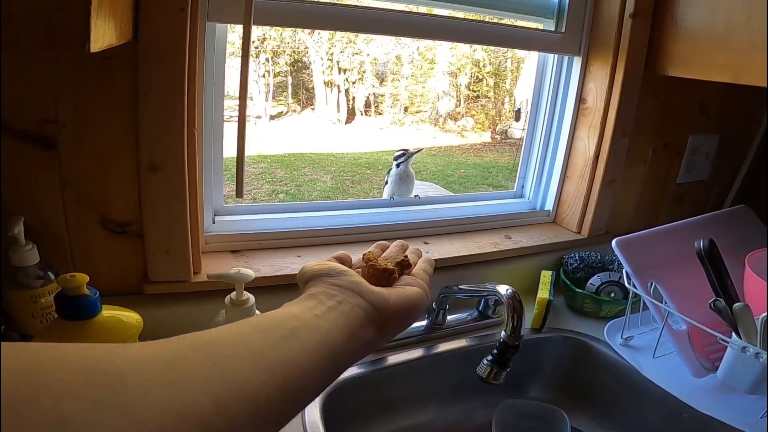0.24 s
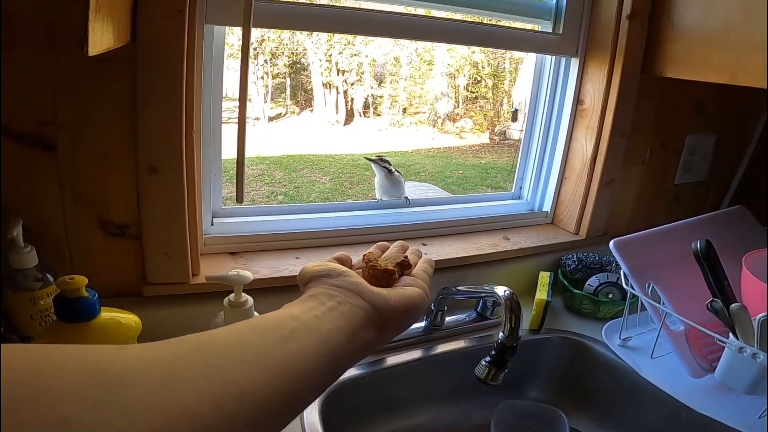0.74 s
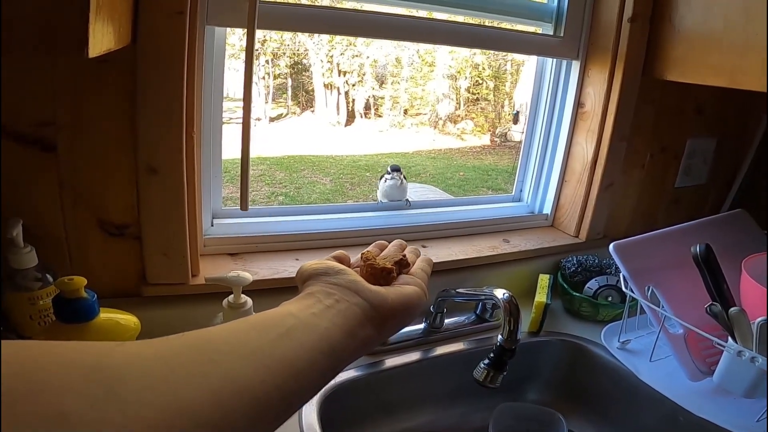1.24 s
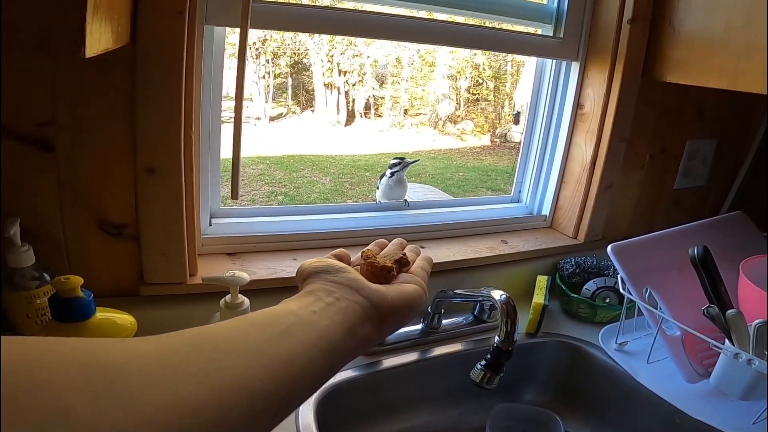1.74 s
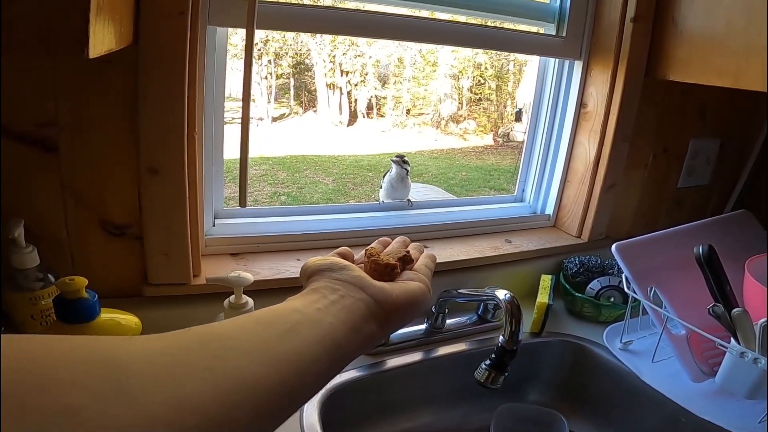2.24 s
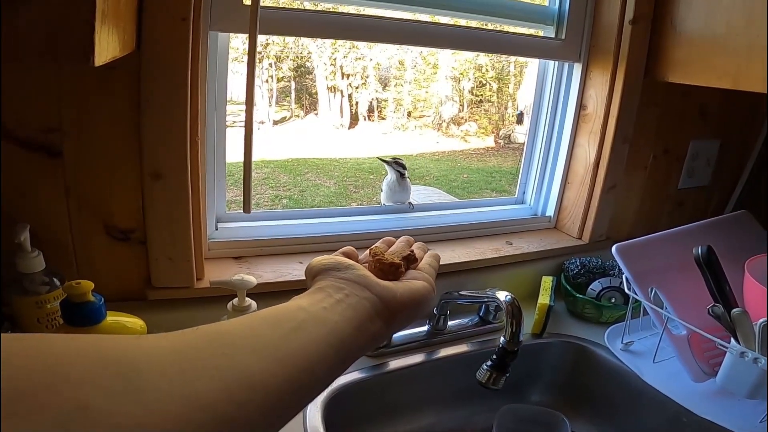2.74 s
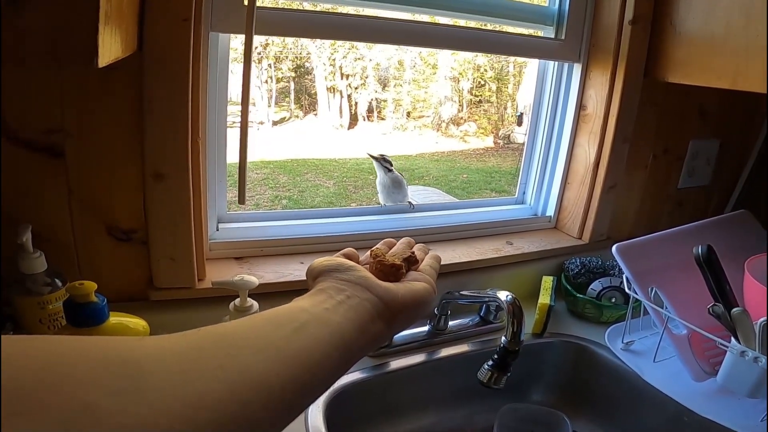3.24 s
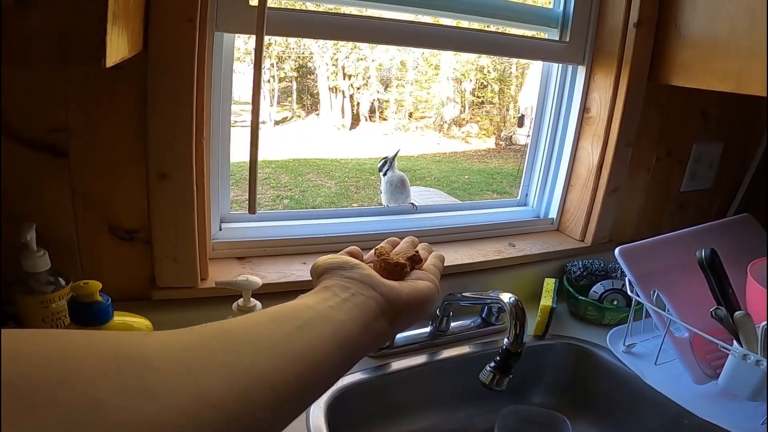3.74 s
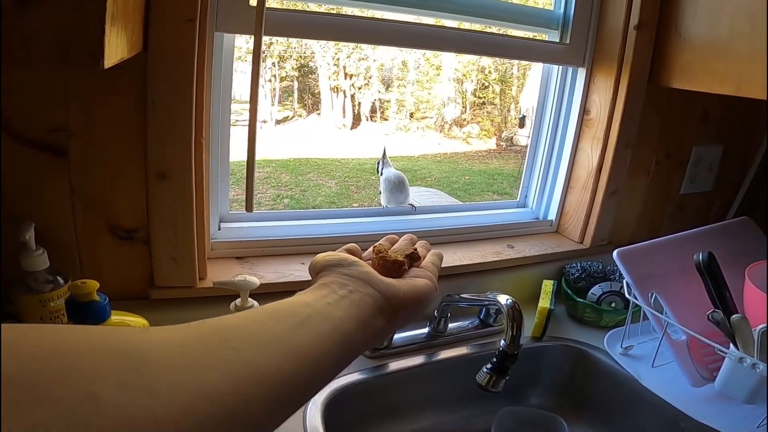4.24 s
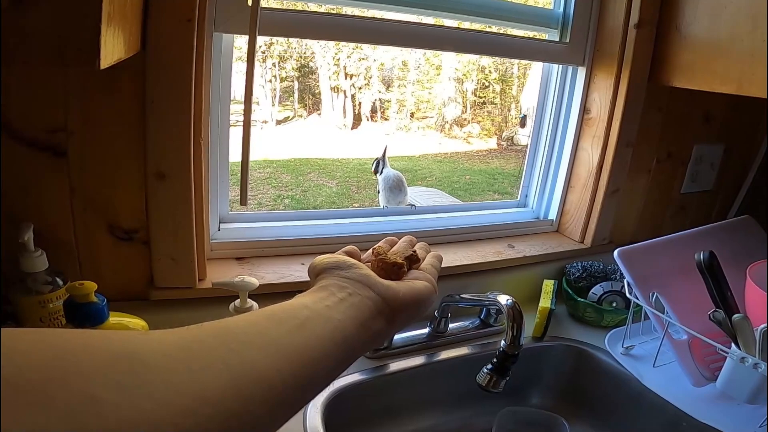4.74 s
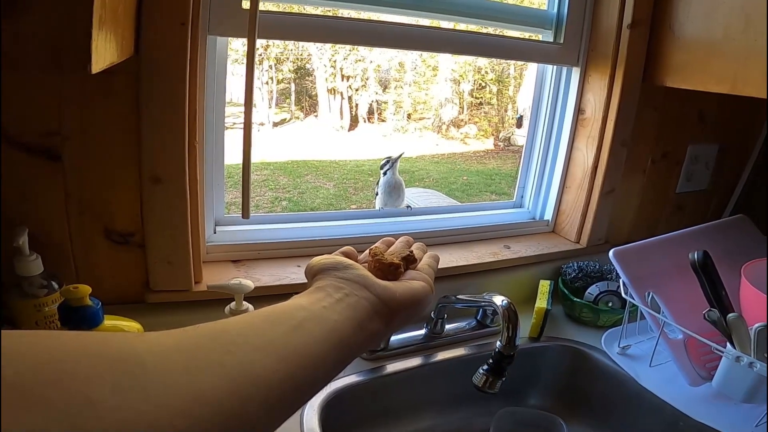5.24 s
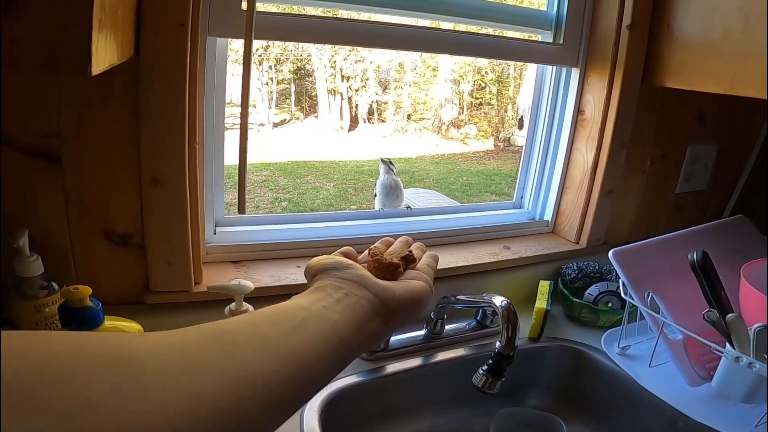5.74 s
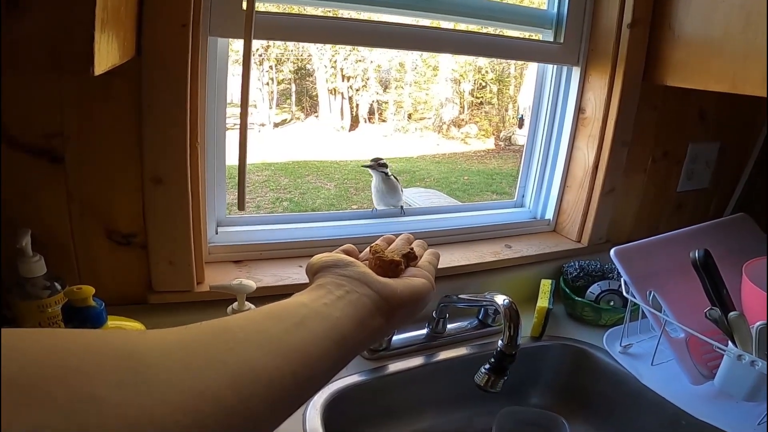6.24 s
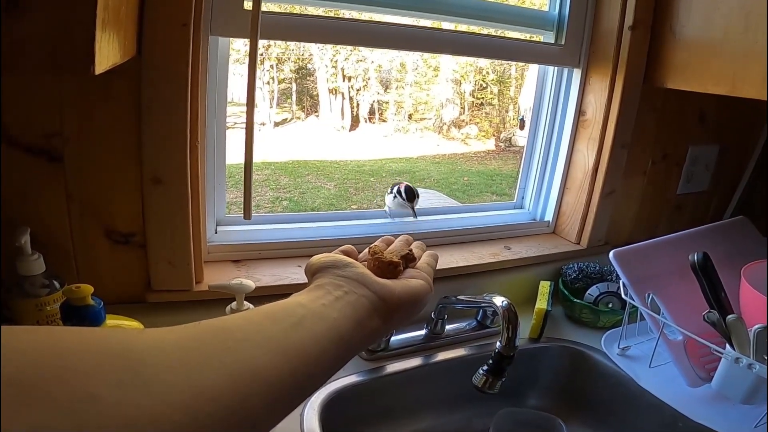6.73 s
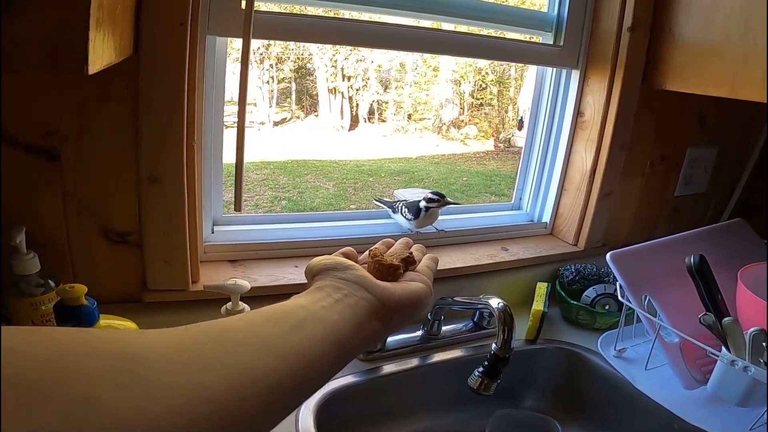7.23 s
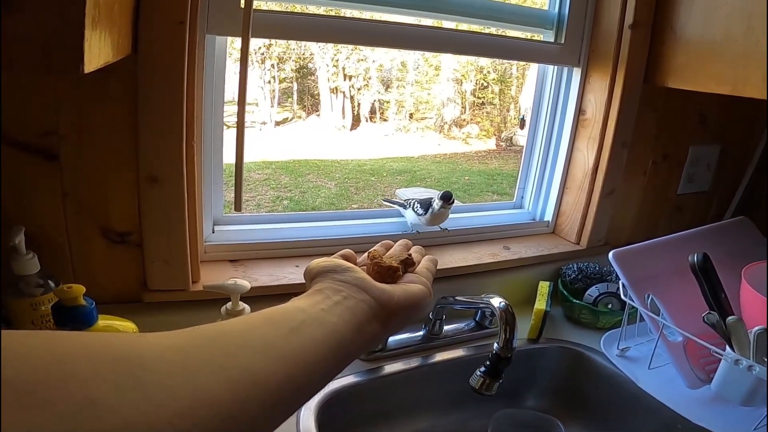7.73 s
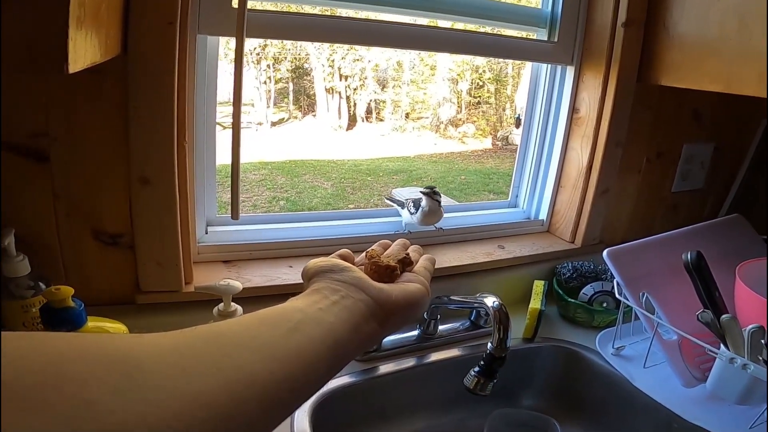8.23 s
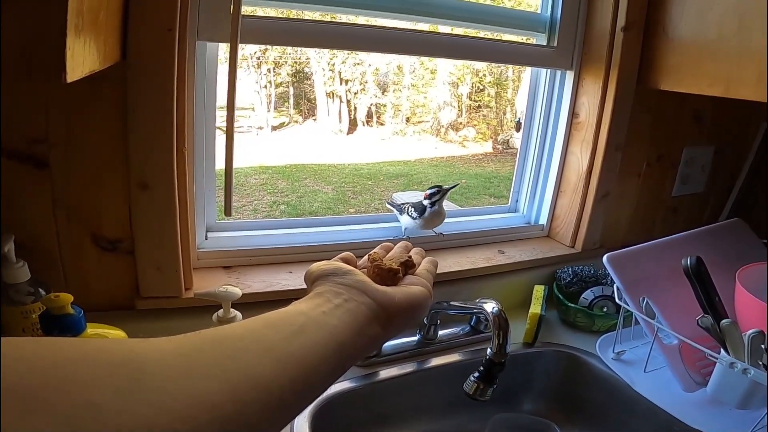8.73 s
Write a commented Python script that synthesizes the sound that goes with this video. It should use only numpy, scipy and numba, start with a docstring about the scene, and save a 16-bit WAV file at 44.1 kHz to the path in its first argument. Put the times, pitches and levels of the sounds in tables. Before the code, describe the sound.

Over a low refrigerator hum and faint chirps from the garden, a nearby woodpecker calls three times, each a short buzz flipping into a piercing whistle that rings briefly in the kitchen. Light wind rumbles and bumps the microphone just before the second call. Toward the end the small birds grow busier and the woodpecker's claws click and scratch on the window frame in two quick clusters.

```python
"""Woodpecker at the kitchen window

A woodpecker gives three sharp calls, each a buzz that flips up into a whistle. It hops, and its
claws tap the window frame. Small birds chirp in the garden, a fridge hums and the air rushes softly.
Wind thumps the left microphone of a small camera, which later joins its two microphones into mono.
The camera turns its volume down after each loud call."""
import sys
import numpy as np
from scipy import signal
from scipy.fft import rfft, irfft, next_fast_len
from scipy.io import wavfile
from scipy.ndimage import uniform_filter1d
from numba import njit

SR = 44100
rng = np.random.default_rng(int(sys.argv[2]) if len(sys.argv) > 2 else 0)


def generate_wav(sig):
    """Save sig (samples, or channels by samples) to the path in sys.argv[1] as 16-bit PCM at SR."""
    pcm = np.round(np.clip(np.atleast_2d(sig).T, -1, 1) * 32767).astype(np.int16)
    wavfile.write(sys.argv[1], SR, pcm)


N = 396018
T = np.arange(N) / SR

# Woodpecker calls: flip_s, drop_s, top_hz, arch_hz, flip_db, drop_db, octave_db, buzz_db
CALLS = [(0.4883, 0.536, 5636, 139.1, -14.5, -9, -19.5, -21),
         (3.180, 3.228, 5722, 170.1, -16, -12, -28, -20),
         (6.0805, 6.1318, 5577, 399.8, -15.5, -4.5, -21.5, -29.5)]
# Flutter heard on each held whistle as room echoes add and cancel: time_s, level_db
ECHO_FLUTTER = [
    [(.4895, -13.5), (.495, -20.5), (.510, -28.5), (.52, -16.5), (.532, -24.5), (.536, -27.5)],
    [(3.1815, -23), (3.188, -14.5), (3.197, -24.5), (3.211, -21), (3.222, -16), (3.228, -25.5)],
    [(6.084, -7.5), (6.088, -24.5), (6.096, -21), (6.105, -7), (6.112, -25), (6.122, -26.5), (6.1295, -8),
     (6.1315, -21)],
]
# Tones in the buzz: multiple (of half the whistle's pitch), level_db
BUZZ_TONES = [(1, -2), (3, 1), (5, -5.5), (7, -12)]
# How the throat colours the buzz: pitch_hz, gain_db
THROAT = [(500, -10), (900, -3.5), (1500, -3.5), (3000, 1.5), (6500, 2.5), (8000, -3), (9500, -14),
          (11300, -13.5), (12000, -30)]
# Claws hitting the frame: start_s, level_db, rise_s, fade_s, brightness_db_per_octave
TAPS = [(4.476, -58, 0.00095, .03, 3), (4.819, -49, .001, 0.032, -1), (5.213, -48.5, 0.0017, .05, -11),
        (6.448, -44.5, 0.0036, 0.085, -8), (6.523, -54, .003, 0.092, 1.5), (6.862, -46, 0.012, 0.051, 2),
        (6.880, -25.5, 0.00092, 0.064, 2.5), (6.934, -35, 0.005, .03, -6),
        (6.944, -21.5, 0.0017, 0.0786, -2), (7.272, -43, 0.026, 0.19, -4.5),
        (7.346, -39.5, 0.00094, 0.092, 1), (7.3948, -28, .001, 0.071, -1),
        (7.4116, -29.5, 0.0012, 0.061, -0.5), (7.446, -36.5, 0.0019, 0.081, -2.5),
        (7.965, -54, 0.021, 0.34, -3), (8.033, -58.5, 0.0019, .05, 2.5), (8.21, -49.5, 0.0079, 0.2, -6.5),
        (8.364, -45.5, 0.0055, 0.22, -6)]
# Notes the window frame rings at: pitch_hz, half_width_hz, level_db
FRAME_NOTES = [(1820, 320, 0), (3070, 850, -6.5), (4660, 490, 1.5), (5590, 304, -7), (6300, 150, 5),
               (7170, 450, 4)]
# Two-voiced cheeps: start_s, length_s, peak_hz, arch_depth (0-1), level_db, lower_voice_db, octave_db
CHEEPS = [(.948, .12, 3320, .6, -63.5, -67, -30), (1.192, 0.12, 3314, 0.88, -62, -61.5, -22.5),
          (2.519, 0.12, 3536, 0.94, -58, -62.5, -15.5), (3.738, 0.13, 3420, .95, -61, -61, -36.5),
          (4.088, .16, 3490, .8, -60, -58, -37), (4.34, 0.13, 3300, 0.39, -58, -55.5, -12.5),
          (5.42, 0.15, 3150, 0.22, -72, -82, -33), (5.576, .11, 3044, 0.16, -54.5, -75.5, -15),
          (5.59, .087, 3580, 0.1, -59, -80.5, -11), (5.758, .16, 3750, 0.92, -53, -59, -26),
          (6.546, 0.064, 3100, .4, -56, -73.5, -12), (6.754, .1, 3627, 0.38, -54, -74, -19),
          (7.105, .14, 3374, .9, -53, -68, -16)]
# Short hoarse chirps: start_s, length_s, start_hz, end_hz, level_db
HOARSE_CHIRPS = [(.002, .028, 5400, 4340, -58), (.084, 0.032, 7600, 4500, -60.5),
                 (.964, .033, 5470, 7030, -63.5), (1.126, .031, 4200, 5060, -64.5),
                 (1.446, 0.019, 3120, 2900, -61.5), (1.735, .09, 3290, 2905, -63.5),
                 (2.014, .011, 3400, 3000, -65.5), (2.234, .015, 3360, 3000, -64),
                 (6.0, .064, 4750, 3136, -55.5), (7.123, 0.078, 3970, 4200, -66)]
# Clear gliding chirps: start_s, length_s, start_hz, end_hz, level_db
CLEAR_CHIRPS = [(.14, .044, 4200, 5880, -63), (.25, 0.035, 6100, 4000, -66), (4.81, 0.034, 3730, 4113, -61),
                (4.85, .2, 3929, 3770, -76), (4.95, .07, 2350, 3397, -74.5), (5.99, 0.058, 2833, 2202, -64),
                (6.441, .05, 4580, 3760, -48.5), (6.569, .045, 4643, 3407, -50),
                (6.699, .05, 4390, 3500, -52), (6.813, .045, 4626, 3650, -51),
                (8.842, 0.037, 2970, 2900, -69)]
# Strength of the wind: time_s, level_db
GUSTS = [(0, -60), (2.3, -66), (2.62, -66.5), (2.74, -48), (2.87, -57), (3.4, -48.5), (3.78, -54),
         (3.9, -50), (4.07, -45), (4.14, -62), (4.3, -47), (4.6, -66), (4.72, -54), (6.12, -53), (6.3, -60),
         (7.0, -49.5), (7.7, -56), (8.38, -51), (8.8, -58), (8.98, -49)]
# Two low wind thumps and one sharp tick on the left microphone: time_s, level_db, pitch_hz
THUMPS_AND_TICK = [(2.6837, -25.5, 68), (2.734, -29, 48), (2.988, -39, 1600)]
# Tones of the fridge: pitch_hz, level_db
HUM_TONES = [(59.5, -49.5), (120, -60), (180, -79.5), (235, -66.5), (423, -69.5)]
# Colour of the background air: pitch_hz, gain_db
AIR_COLOUR = [(25, -32.5), (43, -10.5), (65, -1), (86, -21), (115, -10), (225, -11.5), (367, -20.5),
              (584, -24.5), (1500, -33.5), (3300, -46.5), (4500, -53), (7000, -53), (8500, -70.5),
              (12000, -82)]
# Colour of the camera's hiss in mono: pitch_hz, gain_db
HISS_COLOUR = [(1470, -48.5), (2500, -6.5), (2840, 2), (3530, -4.5), (4320, -7), (5210, -10.5),
               (6780, -2.5), (10900, -35), (15000, -30.5)]
# Slow swells of the background: time_s, air_db, fridge_db
SWELLS = [(0, 0.5, 0), (1, -2.5, -2), (2, 0, 1.5), (3, 0.5, 1), (4, -1.5, 0), (5, -1.5, 3), (5.8, 0.5, 4.5),
          (6.6, -3, -1), (7.5, -2, 1.5), (8.3, -0.5, 1.5), (9, -1.5, 1)]
# First echoes off the window recess, sink and cupboards: delay_s, gain_db
NEAR_WALLS = [(.0046, -9), (.0097, -12), (.0152, -14), (.0215, -15)]
# Lingering echo of the kitchen: pitch_hz, fade_s, gain_db
KITCHEN_ECHO = [(500, 0.35, -1.5), (2000, 0.49, 3.5), (3500, .5, -2.5), (5663, 0.49, 2), (8200, 0.46, -2.5),
                (11065, 0.39, -6), (14000, 0.22, -7.5)]
# Lingering echo of the trees: pitch_hz, fade_s, gain_db
TREE_ECHO = [(2000, 0.72, 0.5), (8015, 0.45, -1)]
# Treble on the left side compared with the right: time_s, gain_db
LEFT_TREBLE = [(0, -8), (.45, -12.5), (.9, -7.5), (1.5, -7), (2.4, 0.5), (2.9, -12.5), (3.15, -25.5),
               (3.6, -23.5), (4.2, -30), (4.4, -3.5)]

LEAD_S, DROP_S, TAIL_S = .0125, .0036, .017  # a call's lead-in, its quick drop, its whole ending
JOIN_S = (4.36, 4.52)  # the microphones blend into mono between these times


def woodpecker():
    """A low buzzy voice flips to a pure whistle an octave up, holds, and drops again."""
    out = np.zeros(N)
    for (flip, drop, top_hz, arch_hz, *levels), flutter in zip(CALLS, ECHO_FLUTTER):
        span = slice(int((flip - LEAD_S - .002) * SR), int((drop + TAIL_S + .004) * SR))
        hz = call_pitch(T[span], flip, drop, top_hz, arch_hz)
        curves = call_levels(T[span], flip, drop, np.abs(top_hz - hz), flutter, *levels)
        hz, whistle_db, buzz_db, octave_db = (uniform_filter1d(c, size=40) for c in (hz, *curves))
        phase = np.pi * np.cumsum(hz * (1 + .0021 * wobble(600)[span])) / SR  # at half pitch
        whistle = undb(whistle_db) * np.sin(2 * phase)
        octave = undb(octave_db + 1.6 * wobble(1200)[span]) * np.sin(4 * phase)
        buzz = sum(undb(db + 3 * wobble(700)[span]) * np.sin(k * phase) for k, db in BUZZ_TONES)
        breath = (undb(whistle_db - 25) + undb(buzz_db - 7.5)) * rng.standard_normal(len(hz))
        out[span] += np.sqrt(2) * (whistle + octave + colour(undb(buzz_db) * buzz + breath, THROAT))
    return out


def call_pitch(t, flip, drop, top_hz, arch_hz):
    """The pitch of one call glides up, leaps onto a gentle arch, drops fast and slides away."""
    def arch(t):
        return top_hz - arch_hz * (2 * (t - flip) / (drop - flip) - 1.35) ** 2  # peaks past halfway

    start_hz, flip_hz, landing_hz = 1878, 2798, 3977
    leap_s, slide_hz_per_s = .0016, 85000
    lead = np.interp(t, [flip - LEAD_S, flip], [start_hz, flip_hz])
    hold = arch(t) - (arch(flip) - flip_hz) * np.exp(-np.abs(t - flip) / leap_s)
    drop_left = np.clip(1 - (t - drop) / DROP_S, 0, 1) ** 2
    slide = landing_hz + (arch(drop) - landing_hz) * drop_left - slide_hz_per_s * (t - drop)
    return np.select([t < flip, t < drop], [lead, hold], slide)


def call_levels(t, flip, drop, below_top_hz, flutter, flip_db, drop_db, octave_db, buzz_db):
    """Loudness of whistle, buzz and octave in one call; the buzz nearly stops during the hold."""
    start, landing, end = flip - LEAD_S, drop + DROP_S, drop + TAIL_S
    fade_db_per_s = 2600
    swell = [(start, flip_db - 30), ((start + flip) / 2, flip_db - 9), (flip, flip_db)]
    fade = [(landing, drop_db), (end, drop_db - fade_db_per_s * (end - landing))]
    whistle = curve(t, [*swell, *flutter, *fade])
    buzz = curve(t, [(flip - .004, -32), (flip, buzz_db), (flip + .0077, -56),
                     (drop - .003, -56), (drop, -36.5)])
    octave = np.select([t < flip, t < drop], [-39, octave_db - .26 * below_top_hz], whistle - 25)
    edges = curve(t, [(start - .001, -34.5), (start, 0), (end, 1.5), (end + .004, -35)])
    return whistle + edges, buzz + edges, octave + edges


def claws(size=8192):
    """Each tap is a gritty scrape that makes the window frame ring."""
    hz, t = np.maximum(np.arange(size // 2 + 1) * SR / size, 1), T[:size]
    ring = undb(-12.5) + sum(undb(db) / (1 + ((hz - note) / width) ** 2)
                             for note, width, db in FRAME_NOTES)
    ring *= (hz / 1200) ** 2 / (1 + (hz / 1200) ** 2)  # less bass
    ring /= 1 + (hz / 8500) ** 4  # less high treble
    out = np.zeros(N + size)
    for start, db, rise_s, fade_s, brightness in TAPS:
        grit = rfft(rng.standard_normal(size))
        scrape = irfft(grit * ring * undb(brightness * np.log2(hz / 4000)))
        loudness = np.minimum(t / rise_s, undb(-60 * (t - rise_s) / fade_s))
        out[int(start * SR):][:size] += set_level(scrape, db - 7.5) * loudness
    return out[:N]


def garden_birds():
    """Small far-off birds whistle arches and glides, smeared by echoes from the trees."""
    out, warble = np.zeros(N), wobble(900)

    def chirp(start, length, pitches, db, warble_hz, octave_db=-30):
        """One whistle bends through three pitches; more warble makes it hoarser."""
        span = slice(int(start * SR), int((start + length) * SR))
        u = (T[span] - start) / length  # runs from 0 to 1
        first, middle, last = pitches
        hz = first * (1 - u) * (1 - 2 * u) + 4 * middle * u * (1 - u) + last * u * (2 * u - 1)
        phase = 2 * np.pi * np.cumsum(hz + warble_hz * warble[span]) / SR
        tone = np.sin(phase) + undb(octave_db) * np.sin(2 * phase)
        out[span] += undb(db) * np.abs(np.sin(np.pi * u)) ** .2 * tone

    for start, length, peak_hz, depth, db, lower_db, octave_db in CHEEPS:
        upper = peak_hz * (1 - depth * np.array([.21, 0, .15]))
        lower = peak_hz * np.array([.92, .86, .77])
        chirp(start, length, upper, db, warble_hz=120, octave_db=octave_db)
        chirp(start + .4 * length, .59 * length, lower, lower_db, warble_hz=120)
    for table, warble_hz in ((HOARSE_CHIRPS, 230), (CLEAR_CHIRPS, 25)):
        for start, length, start_hz, end_hz, db in table:
            middle_hz = start_hz + .56 * (end_hz - start_hz)
            chirp(start, length, (start_hz, middle_hz, end_hz), db, warble_hz)
    return add_echo(out, TREE_ECHO, echo_db=-1.5, rise_s=.0018)


def wind():
    """Gusts rumble on the microphone and thump it twice; one sharp tick follows."""
    rumble = colour(rng.standard_normal(N), [(8, -26), (25, 1), (45, 0), (120, -21.5), (400, -71.5)])
    out = set_level(rumble, 0) * undb(curve(T, GUSTS) + 1.9 * wobble(17))
    for time_s, db, hz in THUMPS_AND_TICK:
        cycles = hz * (T - time_s)
        pulse = np.exp(-np.where(cycles < 0, 3.5 * cycles, 1.5 * cycles) ** 2)
        out -= undb(db) * np.sin(2 * np.pi * cycles) * pulse
    return out


def fridge():
    """The fridge's motor hums on mains power, wavering a little."""
    out = np.zeros(N)
    for hz, db in HUM_TONES:
        loudness = np.sqrt(2) * undb(db + .4 * wobble(6))
        out += loudness * np.sin(2 * np.pi * np.cumsum(hz + .6 * wobble(8)) / SR)
    return out


def soft_noise(points, db):
    """A rush of air or a hiss: octave-wide bands of noise, each flickering on its own."""
    out = np.zeros(N)
    for hz in 30 * 2. ** np.arange(10):
        band = [(hz / 2, -40), (hz / 1.9, -3), (hz, 0), (hz * 1.41, -3), (hz * 2, -40)]
        out += colour(rng.standard_normal(N), band) * undb(.37 * wobble(4.2))
    return set_level(colour(out, points), db)


def add_echo(sound, place, echo_db, rise_s):
    """Many reflections blur into a tail; each band dies away by 60 dB in its fade time."""
    t, tail = T[:SR], 0
    place_hz, fade_s, gain_db = np.transpose(place)
    for hz in 500 * 2 ** np.arange(0, 5.1, .5):
        band = [(hz / 1.2, -60), (hz / 1.19, 0), (hz * 1.19, 0), (hz * 1.3, -60)]
        fade = undb(-60 * t / np.interp(np.log(hz), np.log(place_hz), fade_s))
        tail = tail + colour(rng.standard_normal(SR), band) * fade
    tail *= 1 - np.exp(-t / rise_s)
    tail = colour(tail / np.sqrt(np.sum(tail ** 2)), np.transpose([place_hz, gain_db + echo_db]))
    return sound + signal.fftconvolve(sound, tail[:3 * SR // 4])[:N]


def ducked_left_side(birds, room):
    """The camera turns the left side down by a changing amount, mostly in the treble."""
    treble_db = curve(T, LEFT_TREBLE)
    low = colour(birds, [(2500, 5), (5000, -12.5), (10000, -31)])
    birds = low * undb(.54 * treble_db) + np.roll(birds - low, -1) * undb(treble_db)
    room = colour(room, [(60, -2.5), (250, -2), (1000, -5), (8000, -2)])
    return np.roll(birds + room, 2)  # arrives a touch late


@njit
def follow_loudness(size, rise_s, fall_s):
    """Track how big a sound is, with one speed going up and another coming down."""
    out, now = np.empty(len(size)), 0.
    for i in range(len(size)):
        now += (size[i] - now) / (SR * (rise_s if size[i] > now else fall_s))
        out[i] = now
    return out


def undb(db):
    """Turn decibels into a number to multiply by."""
    return 10 ** (np.asarray(db) / 20)


def set_level(sound, db):
    """Scale a sound to an average (rms) level."""
    return sound * undb(db) / np.sqrt(np.mean(sound ** 2))


def curve(t, points):
    """Join (time_s, value) points with straight lines."""
    return np.interp(t, *np.transpose(points))


def colour(sound, points):
    """Turn lows and highs up or down along (pitch_hz, gain_db) points."""
    hz, db = np.transpose(points)
    n = sound.shape[-1]
    size = 2 * next_fast_len(n // 2 + 1)
    all_hz = np.maximum(np.arange(size // 2 + 1) * SR / size, 1)
    looped = np.concatenate([sound, sound[..., :size - n]], axis=-1)
    return irfft(rfft(looped) * undb(np.interp(np.log(all_hz), np.log(hz), db)), size)[..., :n]


def wobble(rate_hz):
    """A smooth random wiggle, roughly 1 in size."""
    hold = int(SR / rate_hz)
    steps = np.repeat(rng.standard_normal(N // hold + 1), hold)
    return 1.3 * uniform_filter1d(uniform_filter1d(steps, hold), hold)[:N]


def scene():
    """Mix left and right; until they are joined, only the left microphone catches the wind."""
    joined = np.interp(T, JOIN_S, [0, 1])
    swell_s, air_db, fridge_db = np.transpose(SWELLS)
    calls = woodpecker()
    dulled = colour(calls, [(6000, -3.5), (10000, -6)])  # wood swallows the highest treble
    calls += sum(undb(db) * np.roll(dulled, int(delay * SR)) for delay, db in NEAR_WALLS)
    birds = add_echo(calls, KITCHEN_ECHO, echo_db=-8.5, rise_s=.0013) + garden_birds()
    birds += add_echo(claws(), KITCHEN_ECHO, echo_db=-15, rise_s=.004)
    room = soft_noise(AIR_COLOUR, db=-49) + joined * soft_noise(HISS_COLOUR, db=-71)
    room *= undb(np.interp(T, swell_s, air_db))
    hum = undb(np.interp(T, swell_s, fridge_db)) * fridge()
    wide_air = (1 - joined) * soft_noise(AIR_COLOUR, db=-61)  # opposite on the two sides
    gusts = wind()
    left = joined * (birds + room) + (1 - joined) * ducked_left_side(birds, room)
    left += wide_air + hum + gusts * (2 - joined)
    right = birds + room - wide_air + hum + gusts * joined
    return np.array([left, right])


def record(dry):
    """The camera turns loud sounds down, mirrors treble upward around 12 kHz and cuts the very top."""
    limit_db, mirror_hz, mirror_width_hz, top_hz = -32.5, 12000, 3400, 15600
    loudness = follow_loudness(np.abs(dry).mean(axis=0), rise_s=.08, fall_s=.6)
    volume = np.minimum(1, undb(limit_db) / (loudness + 1e-9)) ** .38
    size = 2 * next_fast_len(N // 2 + 1)
    spectrum = rfft(dry * volume, size)
    fold, reach = int(mirror_hz * size / SR), int(mirror_width_hz * size / SR)
    spectrum[:, fold:fold + reach] = undb(-10.5) * np.conj(spectrum[:, fold:fold - reach:-1])
    dips = [(11500, 0), (12000, -8), (12600, 0), (13500, 0), (14300, -15), (15000, -11), (15500, -14)]
    sound = colour(irfft(spectrum, size)[:, :N], dips)
    return signal.sosfilt(signal.ellip(8, .2, 70, top_hz, fs=SR, output="sos"), sound)


dry = scene()
out = record(dry)
generate_wav(out)
```